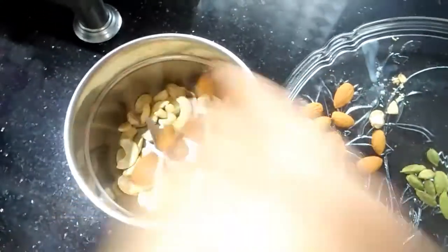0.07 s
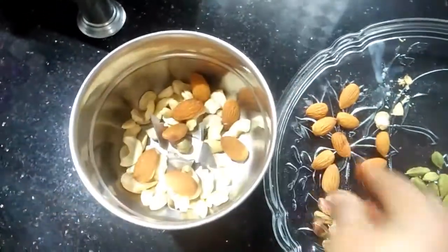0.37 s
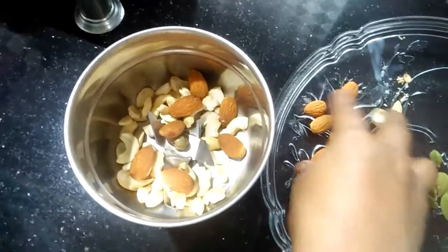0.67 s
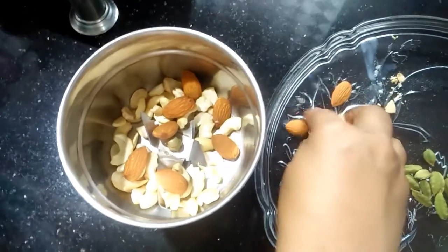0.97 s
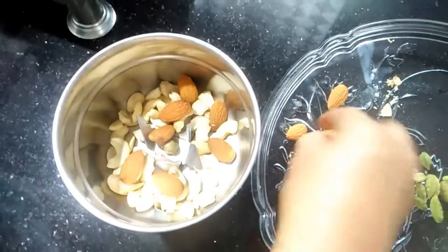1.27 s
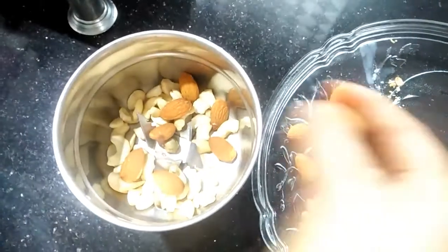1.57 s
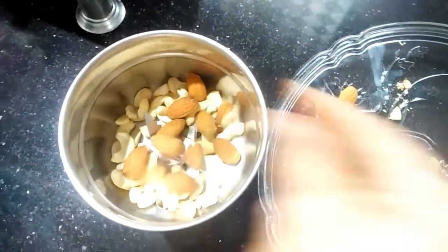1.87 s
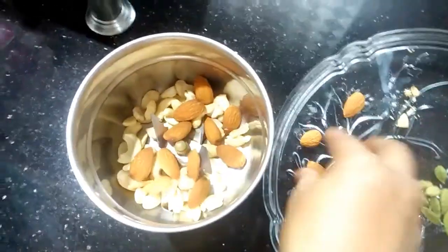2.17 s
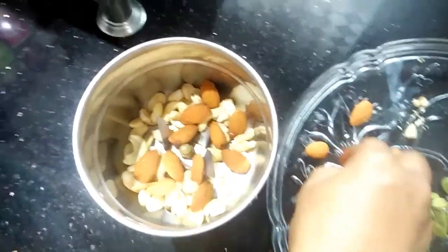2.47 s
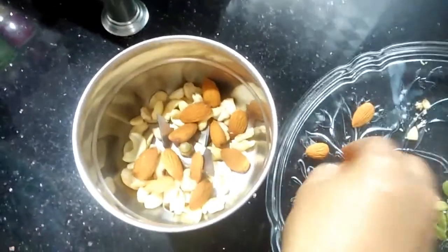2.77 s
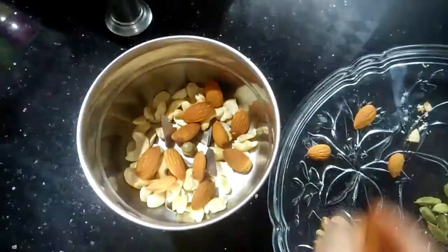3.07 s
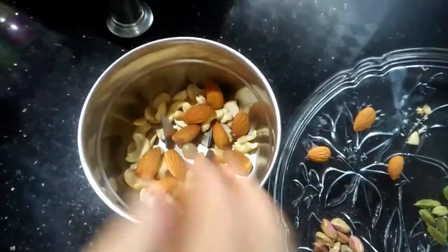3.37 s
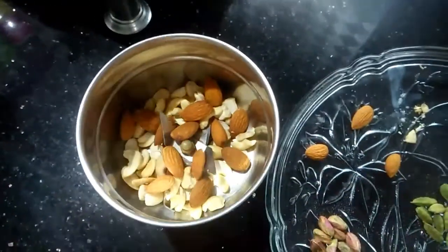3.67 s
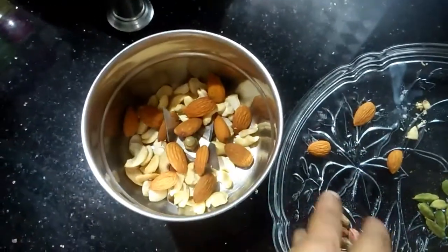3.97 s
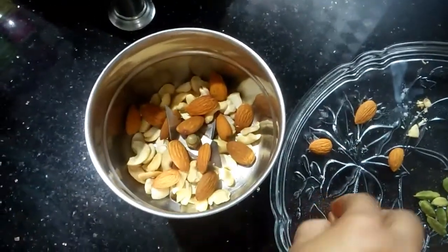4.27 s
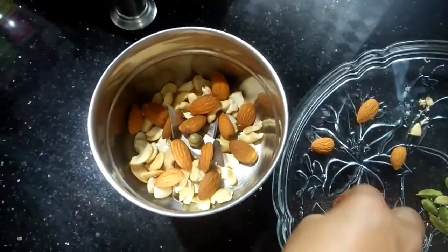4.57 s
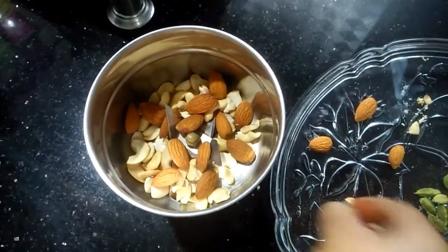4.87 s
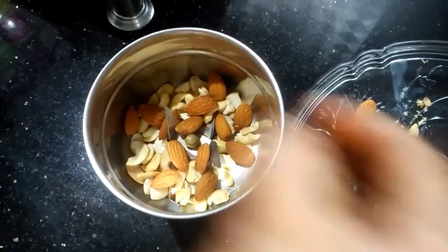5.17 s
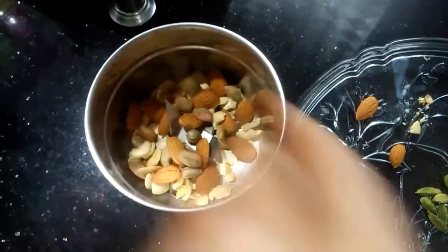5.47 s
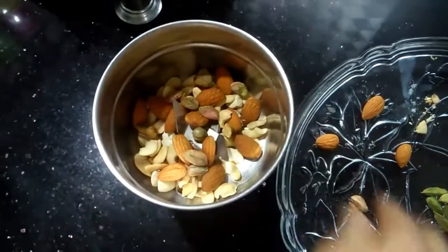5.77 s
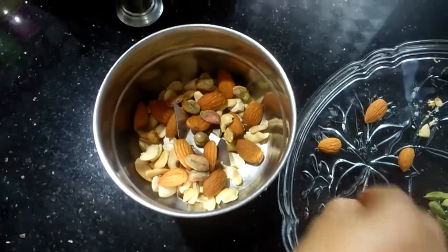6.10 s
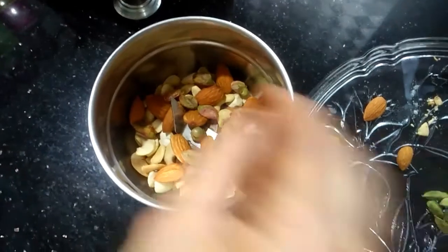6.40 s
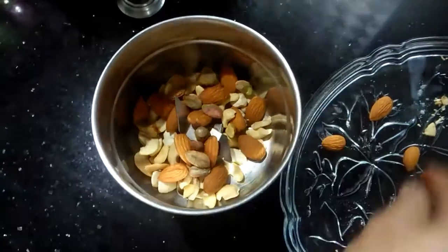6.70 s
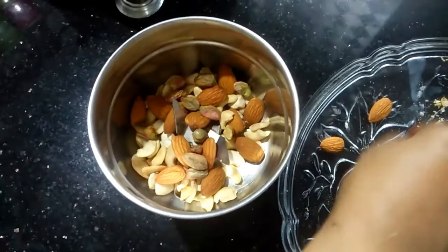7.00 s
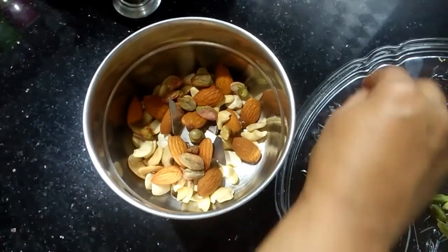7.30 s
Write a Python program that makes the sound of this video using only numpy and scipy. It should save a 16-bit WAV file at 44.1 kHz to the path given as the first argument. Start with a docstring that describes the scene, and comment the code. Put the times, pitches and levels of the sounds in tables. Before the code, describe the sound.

A handful of nuts clatters into a steel jar from about 0.1 to 0.3 seconds, with hollow taps, dry crackle and a light metallic ring. A glass plate knocks on the stone counter at 0.8 seconds, then a nut scrapes faintly and the plate rocks to rest near 1.5. Smaller drops of nuts land around 2, 3.7, 5.5 and 6.7 seconds; the steel pings softly at 3.7 and more clearly at 5.5. Between them the plate knocks again: a loud double knock near 2.4, one at 4.2, a quick pair at 6.1 and a firm last one at 7.1. It settles in soft, quickening bounces around 2.9, 4.9 and 6.3 seconds. Fingers brush the glass with a very faint hiss now and then. Everything sounds close, with short kitchen reverberation over a quiet, wavering rumble and hum.

```python
"""In a small kitchen, nuts are picked off a glass plate and dropped into a steel jar on a stone counter.
They land on the heap with a hollow tock of enclosed air and a crackle; a few strike bare steel,
whose lightly damped modes ring. Fingers rub the plate with a hiss of friction; it tips, knocks on
the counter and rocks back to rest. Hard walls add reverberation, over a low rumble and hum."""
import sys
import numpy as np
from scipy import signal
from scipy.fft import rfft, irfft
from scipy.io import wavfile
from scipy.ndimage import uniform_filter1d

SR = 44100
rng = np.random.default_rng(int(sys.argv[2]) if len(sys.argv) > 2 else 0)


def output_pcm(signal):
    """Save a mono or channel-first signal as 16-bit PCM at the path in sys.argv[1].

    Samples are clipped to [-1, 1] before scaling.
    """
    pcm = np.clip(np.atleast_2d(signal).T, -1, 1) * 32767
    wavfile.write(sys.argv[1], SR, np.round(pcm).astype(np.int16))


N = 323694
TIME = np.arange(N) / SR
AGE = TIME[:SR]   # seconds since a blow


def from_db(db):
    """Amplitude grows tenfold with every 20 dB."""
    return 10 ** (np.asarray(db) / 20)


def fade(t60):
    """A damped vibration decays exponentially, by 60 dB in t60 seconds."""
    return np.exp(-np.log(1000) * AGE / t60)


def pulse(peak_s):
    """A transient rises linearly against an exponential decay, reaching 1 at peak_s."""
    return AGE / peak_s * np.exp(1 - AGE / peak_s)


def add(track, s, sound):
    """Superposition: a sound starting at s seconds adds to the track."""
    at = round(s * SR)
    track[at:at + len(sound)] += sound[:N - at]


def colour(x, points, tilt_db=0, peaks=(), size=2048):
    """A minimum-phase filter of unit power follows (Hz, dB) points and peaks, tilted in dB per octave."""
    hz = np.maximum(np.fft.rfftfreq(size, 1 / SR), 1)
    knots, levels = np.transpose(points)
    gain = from_db(np.interp(np.log(hz), np.log(knots), levels))
    gain += sum(from_db(db) / (1 + (2 * (hz - centre) / width) ** 2) for centre, width, db in peaks)
    gain *= from_db(tilt_db * np.log2(np.clip(hz, 600, 9000)))
    cepstrum = irfft(np.log(gain))
    cepstrum[1:size // 2] *= 2   # folding onto positive time makes the filter causal
    cepstrum[size // 2 + 1:] = 0
    response = irfft(np.exp(rfft(cepstrum)))
    return signal.fftconvolve(x, response / np.linalg.norm(response))[:len(x)]


def rings(modes, gains_db, rise_s):
    """Normal modes struck together swell while the contact lasts, then decay freely."""
    ring = sum((-1) ** k * from_db(db + extra_db) * fade(t60) * np.sin(2 * np.pi * hz * AGE)
               for k, ((hz, db, t60), extra_db) in enumerate(zip(modes, gains_db)))
    return ring * (1 - np.exp(-(AGE / rise_s) ** 2))


def clatter(spectrum, tilt_db, contact_s, tail_db, tail_t60, peaks=()):
    """Chattering contact excites overlapping damped modes, heard as noise; the attack has rms 1."""
    envelope = np.hypot(pulse(contact_s), from_db(tail_db) * fade(tail_t60))
    burst = colour(envelope * rng.standard_normal(len(AGE)), spectrum, tilt_db, peaks)
    return burst / np.std(burst[:400])


def background(air_db=-64.5, waver_db=8.5, wavers_per_s=9.1):
    """Steady broadband room noise lies over a rumble and hum under slow amplitude modulation."""
    # Spectra of the room noise and the rumble. Each row: frequency in Hz, relative level in dB.
    air_spectrum = [(25, -20.5), (55, -10.5), (75, -23), (120, -7.5), (230, -14.5), (300, -4), (364, -21),
                    (425, -3), (520, -9), (900, -3), (1250, -7), (2000, -7), (2600, -16.5), (3500, -24.5),
                    (6000, -27.5), (14000, -32)]
    rumble_spectrum = [(15, -38), (30, -31), (52, 2), (70, -5.5), (82, -11.5), (100, 5.5), (120, -15.5),
                       (250, -16.5), (600, -47)]
    # The swell of rumble and hum. Each row: time in seconds, gain in dB.
    swells = [(.1, -59), (.5, -75), (1.08, -71.5), (1.3, -60.5), (1.6, -63), (2, -72), (2.68, -77.5),
              (3, -55.5), (3.5, -68), (3.95, -58.5), (4.6, -63), (6.25, -67.5), (6.55, -76), (6.95, -68)]
    air = from_db(air_db) * colour(rng.standard_normal(N), air_spectrum)
    rumble = from_db(-2) * colour(rng.standard_normal(N), rumble_spectrum, size=8192)
    hum = from_db(-7) * np.sin(2 * np.pi * 100 * TIME)
    swell_db = np.interp(TIME, *np.transpose(swells))
    waver = np.interp(TIME * wavers_per_s, np.arange(1000), rng.uniform(-1, 1, 1000))
    return air + from_db(swell_db + waver_db * waver) * (rumble + hum)


def nut_contacts(hops=3, hop_s=.016, loss_db=11, detune=.062):
    """Inelastic collision: each nut lands, then settles in weaker hops at uneven times."""
    # Nuts on the heap. Each row: start in seconds, tock in dB, tock pitch in Hz, crackle in dB.
    landings = [(.118, -33.5, 1112, -39), (0.136, -22, 1109, -35.5), (.148, -29, 1102, -36),
                (.19, -30.5, 1054, -34), (.216, -32.5, 1103, -37), (.231, -28.5, 1052, -42),
                (.268, -32, 1040, -35.5), (1.944, -37, 1170, -49), (1.965, -38, 1047, -34.5),
                (1.973, -28.5, 1016, -44), (2.024, -35, 1050, -49), (2.189, -38, 1010, -72),
                (3.648, -32, 1125, -46), (3.658, -34, 1105, -40), (5.46, -35.5, 1050, -46.5),
                (5.480, -26, 1098, -40.5), (5.524, -33.5, 1026, -43), (6.654, -37.5, 1220, -60),
                (6.665, -32.5, 1045, -50)]
    for s, tock_db, hz, crackle_db in landings:
        yield s, tock_db, hz, crackle_db
        for k in range(1, hops + 1):
            s += hop_s * 2 ** rng.uniform(-.5, .54)
            yield s, tock_db - k * loss_db, hz * (1 + detune * rng.normal()), crackle_db - k * loss_db


def heap():
    """Cavity resonance: a landing pumps the jar's air (the tock) and jostles other nuts (the crackle)."""
    # Spectra of nut against nut and of the air. Each row: frequency in Hz, relative level in dB.
    crackle_spectrum = [(200, -12.5), (370, -8.5), (440, 7.5), (520, -8.5), (750, -2.5), (1050, 17),
                        (1400, 7), (1900, 2.5), (2400, 8), (3400, -10), (5200, 1), (6300, -13.5),
                        (8500, -8.5), (14000, -25.5)]
    cavity = [(600, -43), (860, -11.5), (980, 0), (1080, -13), (1200, -10.5), (1400, -31), (2500, -52)]
    out = np.zeros(N)
    for s, tock_db, hz, crackle_db in nut_contacts():
        tock = pulse(.0046) ** 2 * np.sin(2 * np.pi * hz * AGE)
        hollow = from_db(-15) * fade(.21) * colour(rng.standard_normal(len(AGE)), cavity)
        crackle = clatter(crackle_spectrum, tilt_db=0, contact_s=.0026, tail_db=4.5, tail_t60=.12)
        add(out, s, from_db(tock_db) * (tock + hollow) + from_db(crackle_db) * crackle)
    return out


def steel(pivot_hz=7000, scatter_db=2):
    """Impact excitation: a nut ticks and the jar rings; where it hits sets each mode's strength."""
    # Hits on bare steel. Each row: start in seconds, level in dB, tilt in dB/octave, relative tick in dB.
    pings = [(.136, -64, -19, -10), (0.184, -60, -7, 13), (.207, -42.5, -2.5, -22), (.246, -61, -23, -26),
             (.269, -57.5, -4, -26), (3.689, -49, -3, 7), (5.531, -39.5, -0.5, -3.5)]
    # The jar's modes. Each row: frequency in Hz, relative level in dB, t60 in seconds.
    modes = [(2304, -24, 1), (2929, -30, .9), (3924, -19, .35), (4511, -13, .6), (4937, 2, .35),
             (4958, -7, .38), (5066, -7, .56), (5959, -20, .5), (6130, -21, .55), (6680, -18, .2),
             (7558, -25, .6), (8168, -20, .5), (8887, -2, .37), (9097, -6, .2), (9475, -10, .33),
             (9710, -10, .48), (10650, -12, .36), (11690, -15, .5), (11750, -7, .28), (12950, -14, .3),
             (13965, -19, .24)]
    tick_spectrum = [(3000, -6), (7500, -18), (9300, 2), (12000, 14), (14000, -11)]
    octaves = np.log2(np.array(modes)[:, 0] / pivot_hz)
    out = np.zeros(N)
    for s, db, tilt_db, tick_db in pings:
        ring = rings(modes, tilt_db * octaves + rng.normal(0, scatter_db, len(modes)), rise_s=.0005)
        tick = clatter(tick_spectrum, tilt_db=0, contact_s=.003, tail_db=-25, tail_t60=.08)
        add(out, s, from_db(db) * (ring + from_db(tick_db) * tick))
    return out


def plate_blows(bounces=5, gap_ratio=.73, dulling_db=2.5, note_loss_db=4):
    """Restitution: besides single knocks, the plate bounces ever sooner, softer and duller."""
    # Knocks of and on the plate: it tips onto the counter, and once a nut taps it lightly. Each row:
    # start in seconds, level in dB, tilt in dB/octave, relative glass note in dB, its pitch in Hz.
    knocks = [(.803, -29.5, -0.5, -6.5, 1476), (.814, -34, 0, -20, 1500), (1.137, -52, 3, -10, 1440),
              (2.351, -21, 2, -18, 1380), (2.356, -26.5, -5.5, -5.5, 1515), (2.433, -24.5, 0, -16, 1452),
              (2.444, -36, -2, -9, 1450), (4.151, -27.5, -1, -7, 1475), (4.470, -67.5, 13, -14, 1460),
              (6.085, -25.5, -1, -12, 1430), (6.1209, -28.5, 0, -7, 1450), (7.102, -21, 1, -4, 1459)]
    # Let go, it rocks to rest. Each row: start in seconds, level in dB, first gap in seconds,
    # loss per bounce in dB, relative glass note in dB, its pitch in Hz.
    rockings = [(1.469, -40, 0.069, 5, 0.5, 1452), (2.8897, -37.5, .0565, 5, 0, 1458),
                (4.9295, -38, .0505, 4.5, 3.5, 1444), (6.252, -36, 0.051, 5.5, -4.5, 1443)]
    yield from knocks
    for s, db, gap_s, loss_db, note_db, note_hz in rockings:
        for k in range(bounces):
            tilt_db = -5 - k * dulling_db
            yield s, db - k * loss_db, tilt_db, note_db - k * note_loss_db, note_hz
            s += gap_s * gap_ratio ** k


def plate(lead_s=.0048, rise_s=.0008):
    """Free vibration: a soft touch, then a knock sets the plate ringing; harder knocks chatter longer."""
    # The crowd of damped modes. Each row: frequency in Hz, relative level in dB.
    body_spectrum = [(150, -37), (370, -26.5), (430, -12.5), (520, -17), (780, 1.5), (1050, -2), (1230, -7),
                     (1420, 2), (1750, -6), (2350, -1.5), (2850, -23.5), (4300, -31), (6000, -42),
                     (14000, -70)]
    # Overlapping treble resonances. Each row: centre in Hz, width in Hz, relative level in dB.
    clusters = [(3500, 250, -27), (5200, 450, -24), (6850, 450, -36), (8900, 400, -39), (10900, 500, -44)]
    # The brief thud and the clear modes. Each row: frequency in Hz, relative level in dB, t60 in seconds.
    thud_modes = [(777, -10.5, 0.027), (937, 5, 0.015), (1370, 5.5, 0.052), (2490, -5, 0.017)]
    clear_modes = [(431, -31.5, 0.29), (723, -23, 0.39), (816, -21, 0.043), (895, -9, 0.08),
                   (1098, -33, 0.093), (1378, 4.5, 0.08), (1442, -9, 0.12), (1840, -24, 0.067),
                   (2210, -19, 0.13), (2450, -15.5, 0.14), (3408, -24.5, 0.16), (5010, -23.5, 0.11)]
    modes = thud_modes + clear_modes
    octaves = np.log2(np.array(modes)[:, 0] / 1000)
    out = np.zeros(N)
    for s, db, tilt_db, note_db, note_hz in plate_blows():
        force = np.interp(db, [-38, -22], [0, 1])
        body = clatter(body_spectrum, tilt_db, contact_s=.0022 + .0004 * force,
                       tail_db=-8 + 5 * force, tail_t60=.23, peaks=clusters)
        glass = rings(modes, tilt_db * octaves + rng.normal(0, 1, len(modes)), rise_s)
        note = rings([(note_hz, 0, .25)], [note_db], rise_s)   # the fingers' grip shifts the main note
        touch = clatter(body_spectrum, tilt_db=-9, contact_s=.0029, tail_db=3, tail_t60=.053)
        add(out, s, from_db(db) * (from_db(-1) * body + glass + note))
        add(out, s - lead_s, from_db(db - 13 - 6 * force) * touch)
    return out


def stroke(peak_s, length_s, db, rise_share=.49, ends_down_db=18):
    """Friction noise follows pressure: the gain of one slide swells to a peak and fades."""
    before = (peak_s - TIME) / (rise_share * length_s)
    after = (TIME - peak_s) / ((1 - rise_share) * length_s)
    return from_db(db - ends_down_db * np.maximum(before, after))


def rubbing():
    """Sliding friction: skin hisses on the glass, and a dragged nut excites its main note."""
    # Finger slides. Each row: time of firmest pressure in seconds, length in seconds, peak level in dB.
    strokes = [(1.374, 0.37, -66.5), (2.233, 0.28, -66.5), (2.96, 0.16, -69), (3.607, 0.27, -65),
               (5.066, 0.26, -66.5), (5.843, 0.55, -66), (6.719, 0.26, -65)]
    # Spectra of skin and of nut on glass. Each row: frequency in Hz, relative level in dB.
    skin_spectrum = [(2000, -22), (3900, -4.5), (6500, -17), (8000, -4), (8650, 2.5), (9300, -10.5),
                     (11000, -18), (14000, -10.5)]
    drag_spectrum = [(600, -39), (900, -10), (1380, -30), (1450, -5.5), (1480, 20.5), (1515, -10),
                     (1600, -15), (2350, -20), (3000, -49)]
    hiss = sum(stroke(*row) for row in strokes) * colour(rng.standard_normal(N), skin_spectrum)
    drag = stroke(peak_s=1.398, length_s=.22, db=-47) * colour(rng.standard_normal(N), drag_spectrum)
    return hiss + drag


def handling():
    """Brief contacts give broad spectra: small bumps and ticks, so close that they sound dry."""
    # Light contacts. Each row: start in seconds, level in dB, centre in Hz, contact time in seconds.
    ticks = [(2.298, -64.5, 7000, .001), (2.311, -48.5, 250, 0.0026), (2.3194, -46.5, 1160, 0.00027)]
    out = np.zeros(N)
    for s, db, hz, contact_s in ticks:
        hump = [(hz / 8, -32), (hz / 2, -10), (hz, 0), (hz * 2, -14), (hz * 10, -42)]
        tick = clatter(hump, tilt_db=0, contact_s=contact_s, tail_db=-23.5, tail_t60=.57)
        add(out, s, from_db(db) * tick)
    return out


def kitchen(x, wet_db, t60, build_s):
    """Reverberation: diffuse reflections build up and die away between hard walls."""
    tail = rng.standard_normal(len(AGE)) * fade(t60) * (1 - np.exp(-AGE / build_s))
    tail = colour(tail, [(100, 3), (1000, -3.5), (2500, 1), (6000, 5.5), (14000, -.5)])
    return x + from_db(wet_db) * signal.fftconvolve(x, tail / np.linalg.norm(tail))[:N]


def scene():
    """Sources and reflections superpose alike in both channels; each channel adds its own faint hiss."""
    on_plate = kitchen(plate() + rubbing(), wet_db=-16, t60=.47, build_s=.015)
    on_heap = kitchen(heap(), wet_db=-7.5, t60=.52, build_s=.001)
    on_steel = kitchen(steel(), wet_db=-11, t60=.93, build_s=.0024)
    hiss = signal.lfilter([.5, -.5], [1], from_db(-76) * rng.standard_normal((2, N)))
    return on_plate + on_heap + on_steel + handling() + background() + hiss


def record(dry, open_db=-64, closed_db=-70, depth_db=-7, cutoff_hz=14400):
    """Downward expansion lowers the treble while it is faint; a steep low-pass removes the top."""
    highpass = signal.butter(2, 2800, "high", fs=SR, output="sos")
    lowpass = signal.ellip(12, .2, 80, cutoff_hz, fs=SR, output="sos")
    treble = signal.sosfiltfilt(highpass, dry)
    power = uniform_filter1d(np.mean(treble ** 2, axis=0), size=1500)
    level_db = 10 * np.log10(power + 1e-12)
    gain = from_db(np.interp(level_db, [closed_db, open_db], [depth_db, 0]))
    return signal.sosfilt(lowpass, dry + (gain - 1) * treble)


dry = scene()
out = record(dry)
output_pcm(out)
```